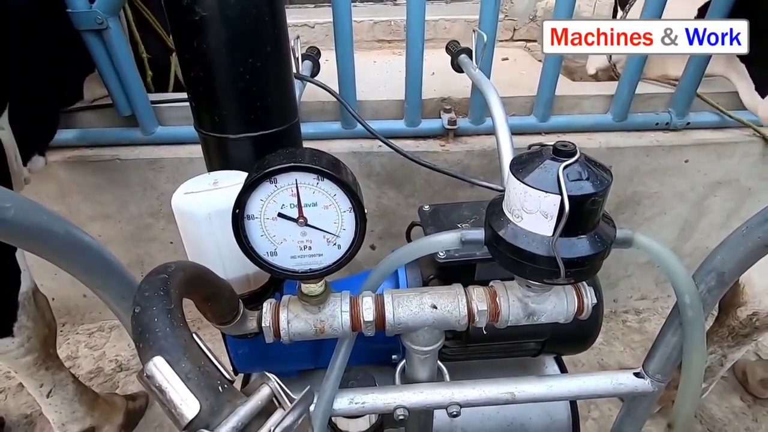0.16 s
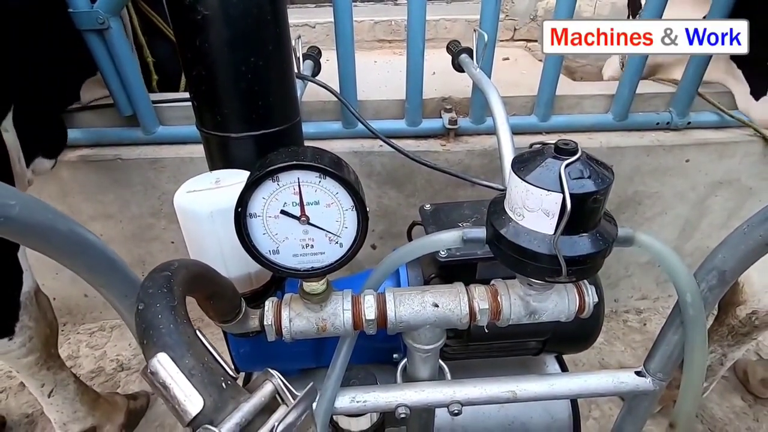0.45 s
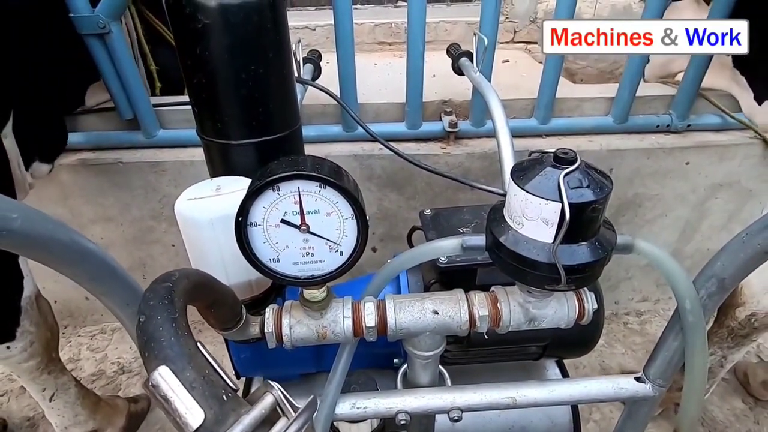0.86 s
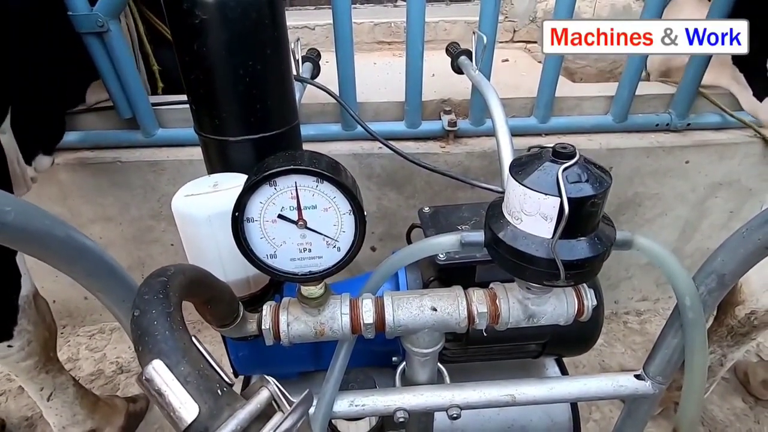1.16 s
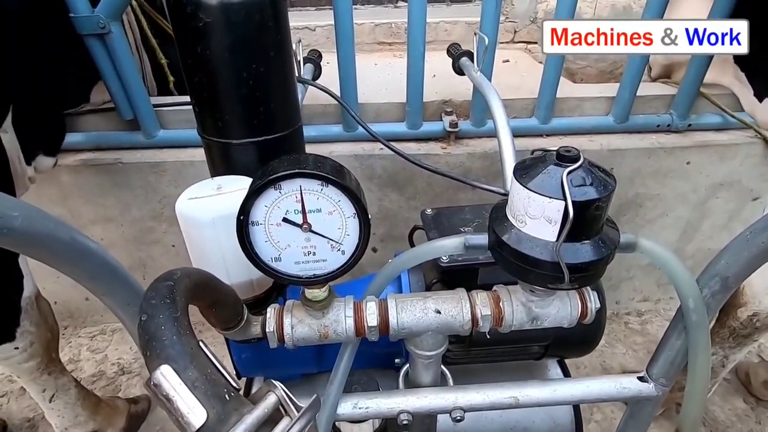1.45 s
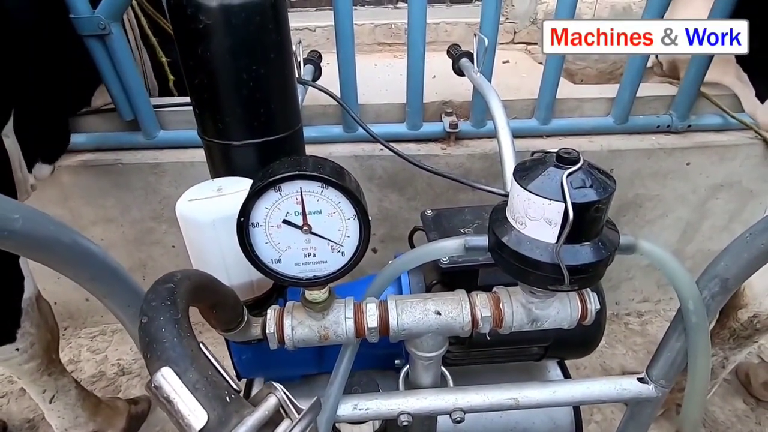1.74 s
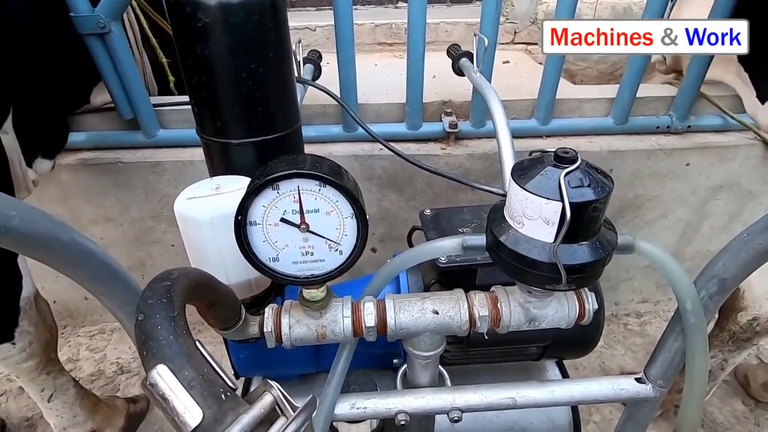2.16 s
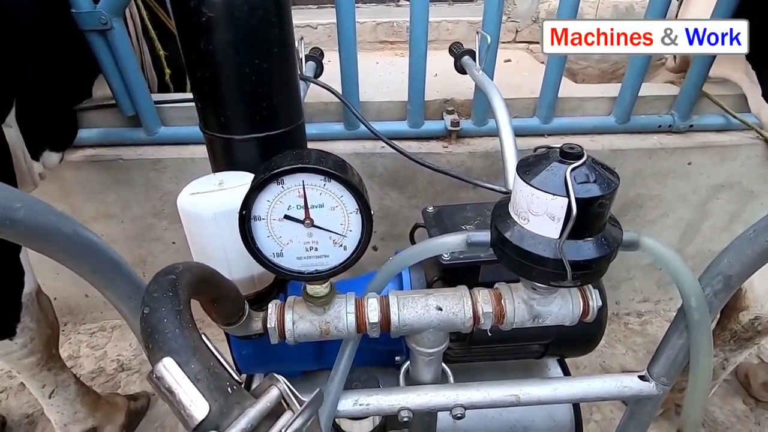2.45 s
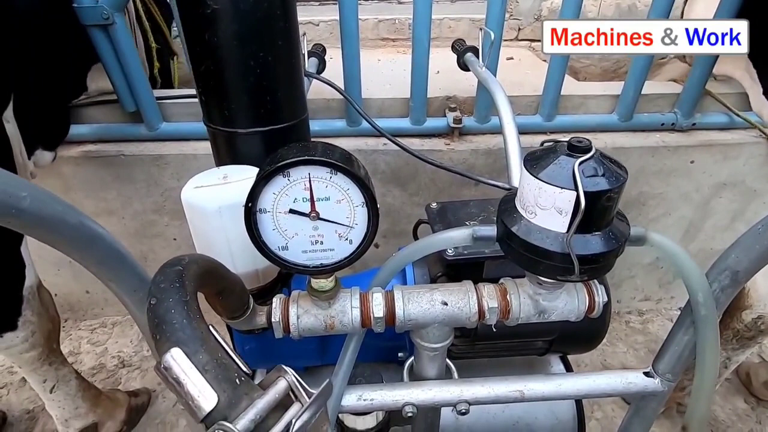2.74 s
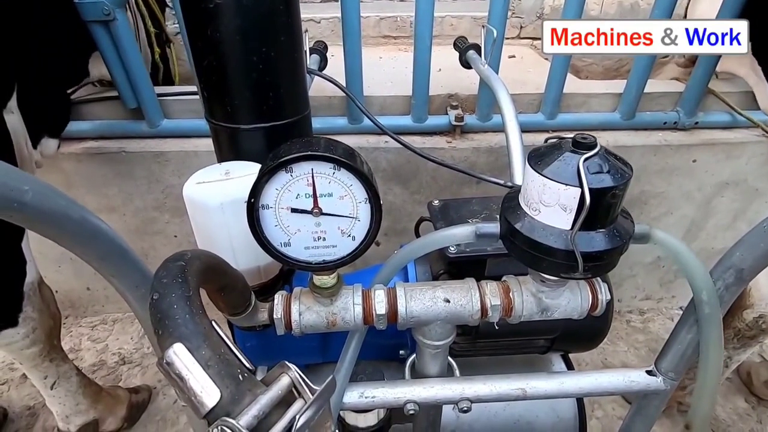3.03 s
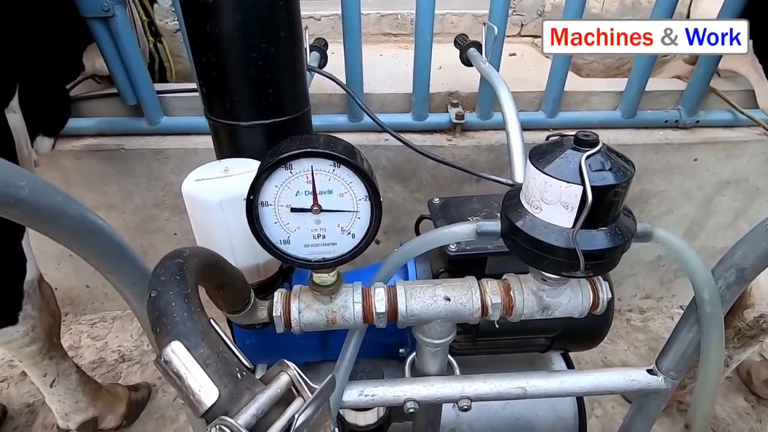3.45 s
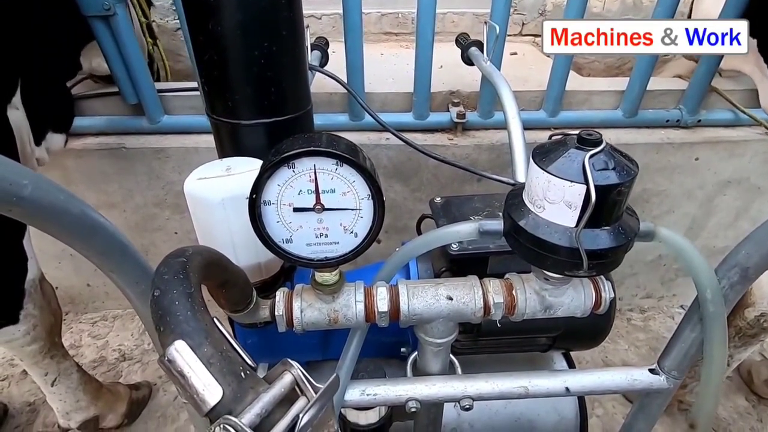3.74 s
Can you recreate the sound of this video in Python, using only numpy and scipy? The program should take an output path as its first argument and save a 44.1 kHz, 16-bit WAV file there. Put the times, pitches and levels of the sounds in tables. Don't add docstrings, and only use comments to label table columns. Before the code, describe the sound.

A vacuum pump drones continuously at a steady speed, a strong low hum near 100 Hz under a rough, hollow pipe buzz, fast metallic ticking and scraping, and rushing air. Short soft air puffs slip through, clearest around 0.2 s, gentler near 0.9 and 2.8 s, others barely audible. The pipe ringing weakens slightly after 2.3 s as the close hand-held microphone drifts away. Open cattle shed, brief diffuse reverberation, faint treble hiss.

```python
import sys
import numpy as np
from scipy import signal
from scipy.fft import rfft, irfft, next_fast_len
from scipy.io import wavfile
from scipy.ndimage import uniform_filter1d, map_coordinates

SR = 44100
rng = np.random.default_rng(int(sys.argv[2]) if len(sys.argv) > 2 else 0)


def gain_from_decibels(decibels):
    exponent = np.asarray(decibels, float) / 20
    return 10 ** exponent


def dump(signal):
    limited = np.clip(np.atleast_2d(signal).T, -1, 1)
    pcm = np.round(limited * 32767).astype(np.int16)
    wavfile.write(sys.argv[1], SR, pcm)


N = 171990
VANES = 4
LEFT_RIGHT = np.array([[.5], [-.5]])


def unit(x):
    return x / np.sqrt(np.mean(x ** 2) + 1e-20)


def along(points, hz):
    f, v = np.transpose(points)
    return np.interp(np.log(hz + 1), np.log(f + 1), v)


def curve(rows):
    s, v = np.transpose(rows)
    return np.interp(np.arange(N) / SR, s, v)


def wobble(rate_hz):
    knots = rng.standard_normal(400)
    return map_coordinates(knots, [np.arange(N) * min(rate_hz, 90) / SR])


def filtered(x, response):
    m = next_fast_len(N + SR // 2)
    return irfft(rfft(x, m) * response(np.fft.rfftfreq(m, 1 / SR)), m)[..., :N]


def pulses(s, size):
    at = s * SR
    ok = (at > 8) & (at < N - 9)
    at, size = at[ok, None], size[ok, None]
    index = at.astype(int) + np.arange(-7, 9)
    d = index - at
    click = size * np.sinc(d) * np.cos(np.pi * d / 16) ** 2
    return np.bincount(index.ravel(), click.ravel(), N)


def ring(x, modes, stagger_s=0):
    widen = 1.55

    def response(f):
        total = 0
        for k, (centre_hz, width_hz, db, pan_db, lead_rad) in enumerate(modes):
            damping = 1j * f * width_hz * widen
            resonance = (damping / (centre_hz ** 2 - f * f + damping)) ** 2
            phase = LEFT_RIGHT * lead_rad - 2 * np.pi * f * stagger_s * (k % 3)
            total = total + gain_from_decibels(db + LEFT_RIGHT * pan_db) * np.exp(1j * phase) * resonance
        return total

    return unit(filtered(x, response))


def rush(spectrum, alike, patchy_db):
    z = signal.stft(rng.standard_normal((2, N)), nperseg=512)[2]
    field = uniform_filter1d(rng.standard_normal(z.shape[1:]), 6, 0)
    field = uniform_filter1d(field, 14, 1)
    pair = signal.istft(z * gain_from_decibels(patchy_db * unit(field)), nperseg=512)[1][:, :N]

    def response(hz):
        turn = np.arccos(np.clip(along(alike, hz), -1, 1)) / 2
        return gain_from_decibels(along(spectrum, hz)) * [np.cos(turn), np.sin(turn)]

    mid, side = filtered(pair, response)
    return unit(np.array([mid + side, mid - side]))


# t/s, vane passes/Hz
SPEED = [(0, 98.81), (2.3, 98.81), (2.9, 98.72), (3.9, 98.63)]


def turns():
    start_turn = .09
    return start_turn + np.cumsum(curve(SPEED)) / SR


def passes(place):
    count = turns()
    wanted = np.arange(int(count[-1]) + 1) + place
    return np.interp(wanted, count, np.arange(N) / SR, left=-1, right=-1)


# multiple of vane rate, level/dB rms, unsteadiness/dB
EXHAUST = [(1, -18.4, 0.19), (2, -25, 0.65), (3, -44, 3.5), (4, -36.5, 1)]


def exhaust():
    lag_rad, shake_rad, beat_lead_rad = 0.33, 0.036, .09
    angle = 2 * np.pi * turns()
    beat = 0
    for k, db, sway_db in EXHAUST:
        level = np.sqrt(2) * gain_from_decibels(db + sway_db * wobble(9))
        shake = shake_rad * k * wobble(13)
        lead = beat_lead_rad / k ** 2 * LEFT_RIGHT
        beat = beat + level * np.cos(k * angle - lag_rad * (k - 1) + shake + lead)
    return beat * gain_from_decibels([[-.2], [.2]])


# puff level/dB, puff delay/s
ROTOR = [(0.5, 0.0001), (-2, .00012), (-5.5, -.0001), (-0.7, .00005)]
# t/s, level/dB
NEAR = [(0.0, -18), (0.03, -31), (2.3, -31.5), (3.77, -37), (3.78, -35), (3.9, -38)]
# f/Hz, width/Hz, level/dB, left-right/dB, left lead/rad
PIPES = [(496.6, 18, -9, 1.5, -0.42), (605, 59, -3, 1, -0.4), (674.4, 19.6, -4.5, -20, 1.9),
         (792.7, 27, 1.5, -2, 0.25), (860, 60, -34, -3, .1), (1094, 48, -4.5, -8, 0.027),
         (1189, 21, -5, 1, -0.48), (1522, 112, -7, 0.5, 1.58)]


def pipework():
    jitter_s, scatter_db, pipes_db = .00005, 2, 0.17
    s = passes(place=0)
    size_db, delay_s = np.transpose(ROTOR)[:, np.arange(len(s)) % VANES]
    chance = rng.standard_normal((len(s), 2))
    at_s = s + delay_s + jitter_s * chance[:, 0]
    puffs = pulses(at_s, gain_from_decibels(size_db + scatter_db * chance[:, 1]))
    return gain_from_decibels(curve(NEAR) + pipes_db) * ring(puffs, PIPES)


# place in pass 0-1, head level/dB, casing level/dB, cover level/dB
TAPS = [(.93, 0, 0, 0), (.52, -15, -15, -11), (.17, -18, -14, -8)]


def taps(levels_db, drift_s, scatter_s):
    drift_hz, swell_hz, swell_db, scatter_db = 14, 12, 2, 1.8
    force = np.zeros(N)
    for (place, *_), db in zip(TAPS, levels_db):
        s = passes(place)
        at = (np.abs(s) * SR).astype(int)
        chance = rng.standard_normal((len(s), 2))
        tap_s = s + drift_s * wobble(drift_hz)[at] + scatter_s * chance[:, 0]
        tap_db = db + swell_db * wobble(swell_hz)[at] + scatter_db * chance[:, 1]
        force += pulses(tap_s, gain_from_decibels(tap_db))
    return unit(force)


# f/Hz, width/Hz, level/dB, left-right/dB, left lead/rad
HEAD = [(2075, 50, -10, 5.5, -.4), (2178, 55, -9, 12, .2), (2275, 45, -3, .9, -1.9), (2368, 45, 1, -1, -.9),
        (2468, 45, -16, .4, .1), (2567, 45, -14, 1.1, .7), (2765, 50, -25, .5, .1)]
CASING = [(4095, 55, -6, 2.5, .3), (4140, 55, -2, 2.5, .4), (4265, 90, -5, 4.5, .2), (4350, 55, -10, 3, .2),
          (4460, 80, -12, 2.2, .2), (4538, 65, -2, .9, .4), (4638, 60, -7, 3, .3), (4732, 65, -5, 9, .6),
          (4830, 60, -16, 3, .3), (4900, 70, -22, 2.2, .3)]
COVER = [(5680, 200, -10, 1.5, 1.1), (6225, 70, 0, 1.5, 1.3), (6325, 70, -3, 1.5, 1.5),
         (6620, 200, -9, 1.2, 1.5), (6820, 120, -9, 1, 1.5), (7015, 50, -6, .9, 1.2),
         (7410, 100, -10, .5, .6), (7580, 100, -9, .4, .3), (7870, 120, -9, .3, .3), (8200, 250, -16, 0, 1),
         (8480, 120, -15, -.8, 1.6), (8950, 400, -19, -1.5, 3), (9300, 300, -18, -1.5, 3),
         (9650, 300, -21, -1.5, 2.9)]
# level/dB, tap drift/s, tap scatter/s, scrape level/dB, mode-to-mode delay/s
PARTS = [(-25, .000026, .000014, -6, .0022), (-29, .000032, .000014, -7, .0002),
         (-37.5, .00003, .00002, -4, .0002)]


def vanes():
    total = 0
    tap_levels = np.transpose(TAPS)[1:]
    for modes, levels_db, part in zip([HEAD, CASING, COVER], tap_levels, PARTS):
        db, drift_s, scatter_s, scrape_db, stagger_s = part
        knocks = taps(levels_db, drift_s, scatter_s)
        scrape = gain_from_decibels(scrape_db) * rng.standard_normal(N)
        total = total + gain_from_decibels(db) * ring(knocks + scrape, modes, stagger_s)
    return total


def turning(x):
    fade_db_per_db = .8
    near_db = curve(NEAR)
    gain = gain_from_decibels(fade_db_per_db * np.clip(near_db - np.median(near_db), -9, 1))
    low_head = filtered(x, lambda hz: (hz > 1950) & (hz < 2225))
    return x + (gain - 1) * low_head


# f/Hz, level/dB per Hz
AIR = [(180, -48), (300, -10.5), (700, -10), (1500, -5.5), (1900, -8), (3000, -16), (7000, -14),
       (9900, -18.5), (10150, -52.5)]
RUMBLE = [(15, -32), (30, -10), (50, -9), (88, -1), (150, -8), (205, -0.4), (280, -11.5), (400, -63)]
# f/Hz, left-right likeness
ALIKE = [(170, -0.76), (460, 0.89), (1250, 0.35), (3460, 0.42), (9520, -0.52), (14000, -0.6)]


def air():
    air_db, rumble_db = -31, -36
    flow = gain_from_decibels(air_db) * rush(AIR, ALIKE, patchy_db=1.5)
    return flow + gain_from_decibels(rumble_db) * rush(RUMBLE, [(30, 1.0), (200, 0.96)], patchy_db=2)


def shed(x):
    t60_s, level_db = .2, -14
    t = np.arange(SR // 3) / SR
    tail = rng.standard_normal((2, len(t))) * gain_from_decibels(-60 * t / t60_s) * (t > .004)
    return gain_from_decibels(level_db) * signal.fftconvolve(x, tail / np.linalg.norm(tail[0]), axes=1)[:, :N]


# multiple of shaft speed, level/dB
SHAFT = [(17, -24.5), (21, -24.5), (22, -24), (25, -27), (26, -19), (27, -14.5), (31, -12), (33, -19),
         (47, -22)]


def shaft():
    sway_db = 3
    angle = 2 * np.pi * turns() / VANES
    tones = 0
    for k, db in SHAFT:
        level = gain_from_decibels(db + sway_db * wobble(4.18))
        phase = rng.uniform(0, 2 * np.pi) + rng.normal(0, 0.24, (2, 1))
        tones = tones + level * np.cos(k * angle + phase)
    return np.sqrt(2) * gain_from_decibels(curve(NEAR)) * tones * gain_from_decibels([[-1.3], [1.3]])


# t/s, level/dB
PUFFS = [
    (.238, -31),
    (.93, -40),
    (1.6, -44),
    (1.92, -46),
    (2.83, -36),
    (3.66, -46),
]
# f/Hz, level/dB per Hz
PUFF = [(600, -120), (1100, -6), (1700, 0), (2800, -2), (3800, -5), (5000, -12), (9000, -40), (10000, -120)]


def pulsator():
    rise_s, hold_s, t60_s = .004, .04, .18
    t = np.arange(N) / SR
    shape = np.zeros(N)
    for s, db in PUFFS:
        decay_db = 60 * np.clip(t - s - hold_s, 0, 9) / t60_s
        shape += gain_from_decibels(db - decay_db) * np.clip((t - s) / rise_s, 0, 1)
    return shape * rush(PUFF, [(1000, .6)], patchy_db=1)


def scene():
    pump = pipework() + turning(vanes())
    flow = air()
    return pump + shed(pump) + shaft() + exhaust() + flow + pulsator()


# f/Hz, level/dB per Hz
HISS = [(9800, -60), (10150, 4), (10400, -7), (11200, -7), (11800, 0), (14800, -1), (15500, -30)]


def hiss():
    level_db = -53.5
    return gain_from_decibels(level_db) * rush(HISS, [(10000, -.4)], patchy_db=0.5)


def roll_off(x):
    return signal.sosfilt(signal.butter(12, 15000, fs=SR, output="sos"), x)


def record(dry):
    gap_low_hz, gap_high_hz = 11250, 11700
    heard = filtered(dry + hiss(), lambda hz: (hz < gap_low_hz) | (hz > gap_high_hz))
    return roll_off(heard)


dry = scene()
out = record(dry)
dump(out)
```